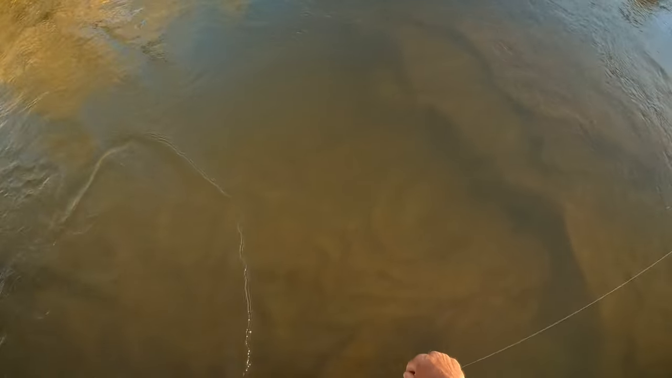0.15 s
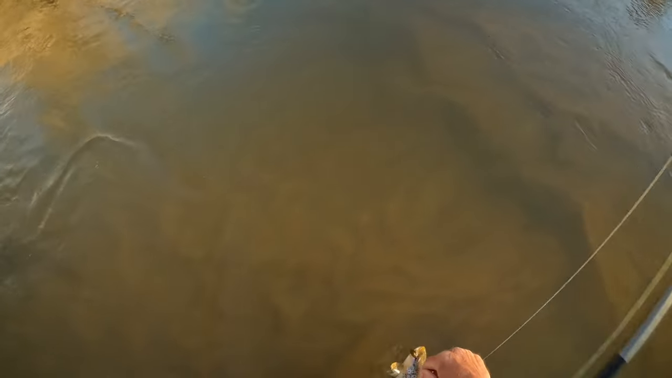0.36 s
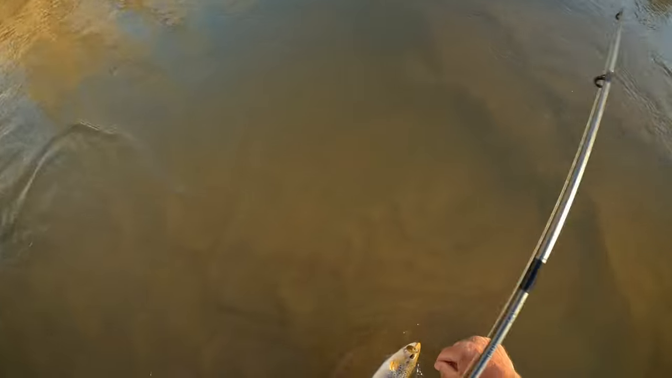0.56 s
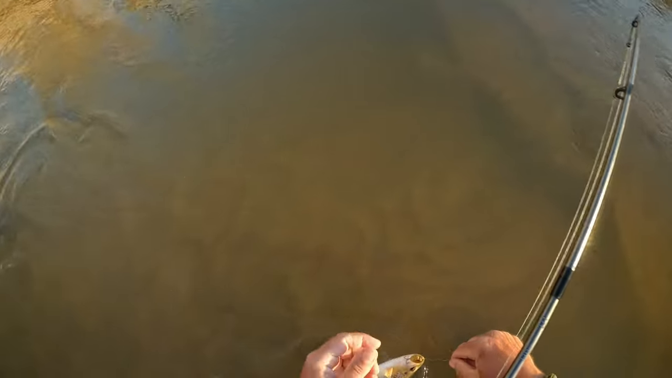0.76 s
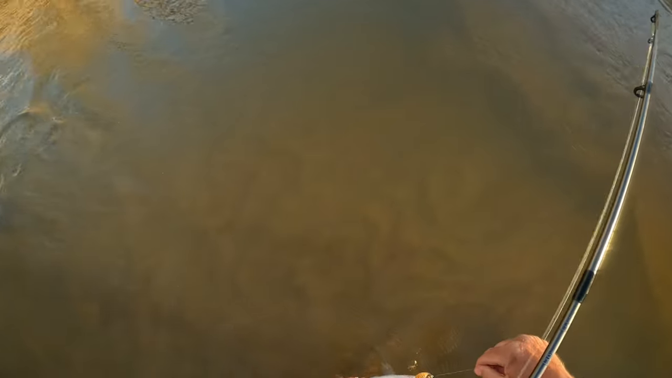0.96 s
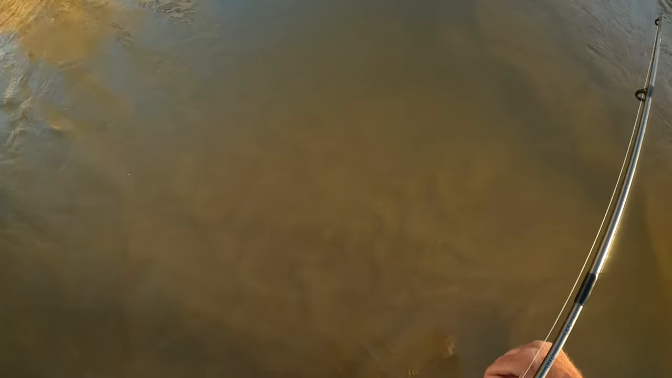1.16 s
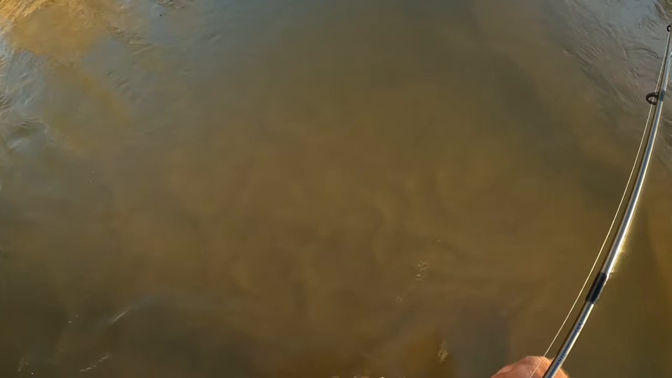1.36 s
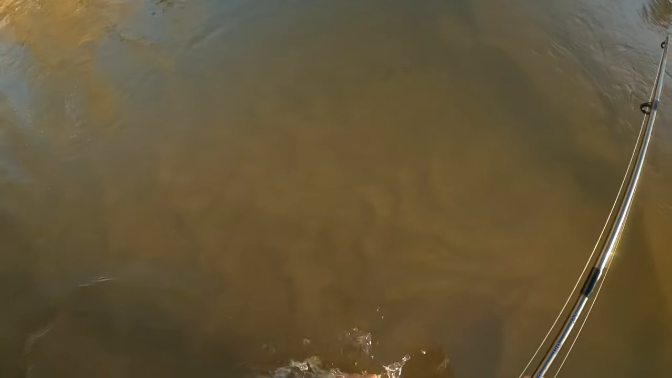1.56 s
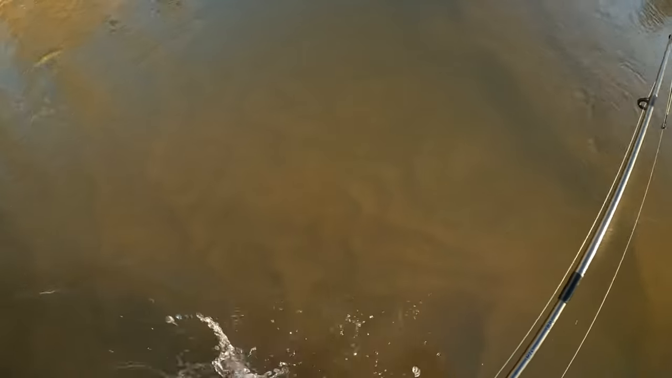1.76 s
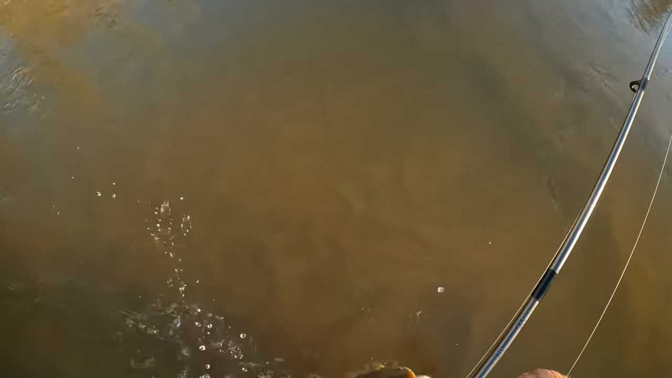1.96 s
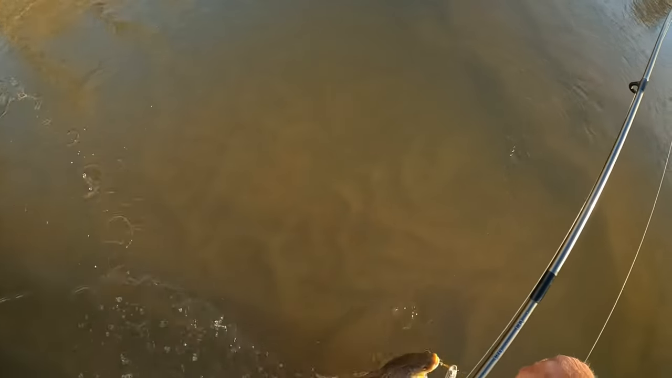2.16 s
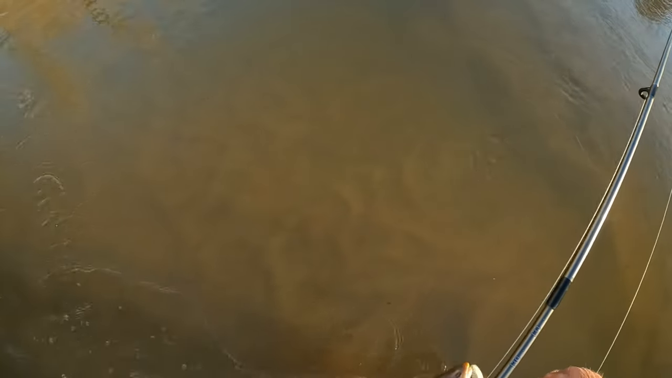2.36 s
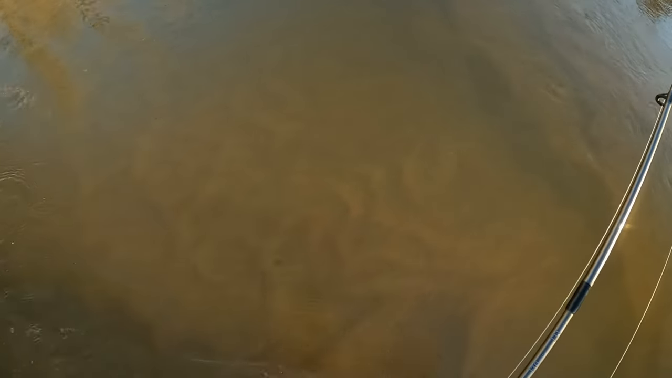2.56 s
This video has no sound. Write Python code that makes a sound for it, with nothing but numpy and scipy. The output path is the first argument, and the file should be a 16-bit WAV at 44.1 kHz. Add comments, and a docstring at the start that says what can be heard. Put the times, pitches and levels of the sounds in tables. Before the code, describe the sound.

Fish splashing: a few soft wet flaps, then a sudden burst of slapping, gulping water and drips

```python
"""A hooked fish is lifted dripping from a stream and flaps: noise-burst slaps and ticks, rising-sine bubbles.
All along, wind (low noise) rumbles on the microphones, mostly the right; the stream hisses and insects buzz
far off (noise bands). At 1.2 s a cricket trills, a pulsed swooping tone. From 1.5 s the fish is back in the
water and thrashes: slaps, spray and bubbles of dense grains, and gulping air pockets, which are gliding tones.
From 1.7 s the metal tackle chinks, clicks ringing a few high modes."""
import sys
import numpy as np
from scipy import signal
from scipy.fft import rfft, irfft, next_fast_len
from scipy.io import wavfile
from scipy.ndimage import uniform_filter1d, map_coordinates

SR = 44100
rng = np.random.default_rng(int(sys.argv[2]) if len(sys.argv) > 2 else 0)


def linear_from_db(decibels):
    """Turn decibels (scalar or array-like) into linear amplitude factors; 0 gives 1."""
    return 10 ** (np.asarray(decibels, float) / 20)


def store_wav(level_fs):
    """Save 16-bit WAV to argv[1]."""
    pcm = np.round(np.clip(np.atleast_2d(level_fs), -1, 1) * 32767)
    wavfile.write(sys.argv[1], SR, pcm.T.astype(np.int16))


N = 114660
T = np.arange(N) / SR

# Colour of water spray, also the treble of the slaps: frequency_hz, level_db
SPRAY_COLOUR = [(1200, -11.5), (2200, -3.5), (5500, -7), (6800, -2.5), (7800, -17), (10500, -11.5),
                (13300, -13.5), (14600, -57)]


def unit(x):
    """Scales a sound to rms 1."""
    return x / np.sqrt(np.mean(x ** 2) + 1e-20)


def along(points, hz):
    """Reads a curve of (Hz, value) points on a log frequency axis."""
    point_hz, value = np.transpose(points)
    return np.interp(np.log(hz + 1), np.log(point_hz + 1), value)


def curves(rows):
    """One value per sample for each column after the time."""
    s, *columns = np.transpose(rows)
    return [np.interp(T, s, column) for column in columns]


def wobble(rate):
    """A smooth random curve with rate knots a second."""
    knots = rng.standard_normal(int(N * rate / SR) + 4)
    return map_coordinates(knots, [T * rate])


def filtered(x, response):
    """Multiplies the spectrum of x by a response of frequency in Hz."""
    size = next_fast_len(x.shape[-1] + 8192)
    spectrum = rfft(x, size) * response(np.fft.rfftfreq(size, 1 / SR))
    return irfft(spectrum, size)[..., :x.shape[-1]]


def coloured(x, colour):
    """Gives a sound the colour of a (Hz, dB) table, at rms 1."""
    return unit(filtered(x, lambda hz: linear_from_db(along(colour, hz))))


def rush(colour, alike, patchy_db):
    """Stereo noise of rms 1 with patches of random gain; alike is the left-right correlation over Hz."""
    z = signal.stft(rng.standard_normal((2, N)), nperseg=256)[2]
    patches = uniform_filter1d(rng.standard_normal(z.shape[1:]), size=6, axis=0)
    patches = uniform_filter1d(patches, size=4, axis=1)
    pair = signal.istft(z * linear_from_db(patchy_db * unit(patches)), nperseg=256)[1][:, :N]

    def mid_and_side(hz):
        turn = np.arccos(np.clip(along(alike, hz), -1, 1)) / 2
        return linear_from_db(along(colour, hz)) * [np.cos(turn), np.sin(turn)]

    mid, side = filtered(pair, mid_and_side)
    return unit(np.array([mid + side, mid - side]))


def grains(count, hz, spread, cycles, scatter_db, pan_db):
    """Small bubbles at random times: damped rising sines, scattered in level and left to right, at rms 1."""
    length = 500  # samples
    chance, place = rng.random((count, 2)), rng.standard_normal((count, 2))
    pitch_hz = np.clip(hz * np.exp(spread * place[:, :1]), 300, 13000)
    turns = pitch_hz * np.arange(length) / SR
    wave = np.sin(2 * np.pi * turns * (1 + .12 * turns / cycles)) * np.exp(-3 * turns / cycles)
    wave = wave * linear_from_db(-scatter_db * np.log(chance[:, 1:] + .006))  # a few grains stand out
    at = ((chance[:, :1] * N).astype(int) + np.arange(length)).ravel()
    sides = [wave * linear_from_db(side * pan_db * place[:, 1:]) for side in (1, -1)]
    return unit(np.array([np.bincount(at, side.ravel(), N + length)[:N] for side in sides]))


def burst(db, hz, octaves, t60_s, skirt):
    """A 0.2 s noise burst with a fast attack, a band around hz and a flat skirt of gain above it."""
    t = np.arange(SR // 5) / SR

    def colour(f):
        band = np.exp(-(np.log2((f + 1) / hz) / octaves) ** 2 / 2)
        treble = linear_from_db(along(SPRAY_COLOUR, np.maximum(f, 5000)))
        return (band + skirt * (f > hz)) * treble

    attack = 1 - np.exp(-t / (0.014 * t60_s))
    noise = unit(filtered(rng.standard_normal(len(t)), colour))
    return linear_from_db(db - 6.5 - 60 * t / t60_s) * attack * noise


def slaps():
    """The body of the fish strikes the surface or the air: short bursts of coloured noise."""
    # Slaps: start_s, level_db (before burst's 6.5 dB cut), centre_hz, width_octaves, t60_s
    slap_rows = [(0.282, -33, 1700, 1.43, 0.047), (0.47, -40, 880, 3, 0.021),
                 (.579, -18, 1330, 0.87, 0.025), (0.602, -38.5, 1370, 1.26, 0.087),
                 (0.623, -22, 1100, 1.12, 0.044), (0.644, -27.5, 1160, 0.81, 0.1),
                 (0.717, -27.5, 607, 0.95, 0.023), (1.078, -21.5, 550, 1.86, 0.073),
                 (.919, -29, 620, 0.4, 0.021), (1.412, -29, 910, 1.21, 0.095),
                 (1.682, -6, 4900, 0.31, 0.0082), (1.764, -9.5, 3580, 4.1, 0.012),
                 (1.888, -6.5, 1880, 1.13, 0.036), (2.46, -27.5, 1400, 0.63, 0.092)]
    out = np.zeros(N + SR)
    for s, db, hz, octaves, t60_s in slap_rows:
        sound = burst(db, hz, octaves, t60_s, skirt=0)
        out[round(s * SR):][:len(sound)] += sound
    return out[:N]


def drop_ticks():
    """Crisp drop impacts: very short narrow bursts with a faint skirt above the centre."""
    # Impacts: start_s, level_db (before burst's 6.5 dB cut), centre_hz
    tick_rows = [(0.11, -28, 1420), (.184, -32.5, 7900), (.217, -30, 1710), (.302, -29.5, 2080),
                 (1.216, -24, 3540), (1.285, -38, 8800), (1.488, -26.5, 3180), (1.512, -15.5, 4370),
                 (1.686, -4.5, 4000), (1.572, -17, 6600), (1.584, -20, 6050), (1.606, -25, 3570),
                 (1.955, -14.5, 2520), (1.976, -23.5, 5630), (2.056, -17.5, 2150), (2.146, -30, 2950),
                 (2.182, -30, 3510), (2.262, -27, 4570), (2.324, -19, 4200), (2.356, -29, 4930),
                 (2.369, -20.5, 3600), (2.407, -39, 3600), (2.423, -29, 4400), (2.461, -30, 5250),
                 (2.564, -27, 9200)]
    out = np.zeros(N + SR)
    for s, db, hz in tick_rows:
        sound = burst(db, hz, octaves=0.39, t60_s=0.011, skirt=linear_from_db(-20.5))
        out[round(s * SR):][:len(sound)] += sound
    return out[:N]


def bubbles():
    """Single bubbles ring as damped sines of gliding, mostly rising pitch, with a shivering level."""
    # Bubbles: start_s, level_db (before shiver and gain), start_hz, rise_octaves_per_s, t60_s
    bubble_rows = [(.037, -38.5, 880, 11, 0.079), (0.112, -34, 1023, -10, 0.022),
                   (0.185, -44, 1305, 9, 0.04), (1.034, -53, 1030, 5.5, 0.15),
                   (1.546, -43.5, 1147, 5.5, 0.16), (1.572, -9.5, 324, 41, 0.0062),
                   (1.585, -25.5, 1784, -4, 0.013), (1.594, -36, 510, 28.5, 0.085),
                   (1.617, -35.5, 539, 39, 0.063), (1.633, -47, 1030, 5.5, 0.11),
                   (1.7656, -3, 315, -7, 0.019), (1.772, -18, 262, -7, 0.078),
                   (1.802, -19.5, 437, 55.5, 0.075), (1.849, -17, 626, 0, 0.013),
                   (1.872, -23.5, 941, -3, 0.043), (1.888, -20, 930, 8.5, 0.022),
                   (2.013, -37, 1278, 10, 0.059), (2.056, -34.5, 1810, 3, 0.02),
                   (2.209, -38, 2520, -43, 0.039), (2.314, -37.5, 1800, 18.5, 0.064),
                   (2.329, -34.5, 1355, -4, 0.043), (2.398, -42, 2400, 2, 0.021),
                   (2.53, -35.5, 1160, 15, 0.016), (2.542, -38, 2090, 21, 0.053)]
    out, t = np.zeros(N + SR), np.arange(SR // 5) / SR
    shiver_db = np.pad(2.5 * wobble(250), (0, SR))
    for s, db, hz, rise, t60_s in bubble_rows:
        start = round(s * SR)
        pitch_hz = hz * 2 ** (rise * np.minimum(t, t60_s))
        level = linear_from_db(db - 60 * t / t60_s + shiver_db[start:][:len(t)])
        attack = 1 - np.exp(-t * hz / 0.93)
        out[start:][:len(t)] += level * attack * 2.74 * np.sin(2 * np.pi * np.cumsum(pitch_hz) / SR)
    return out[:N]


def air_pockets():
    """Open air pockets ring while they close: unsteady gliding tones."""
    # One table a pocket: time_s, pitch_hz, level_db (before the 2 dB lift); pitch and level waver around these
    pocket_tables = [
        [(1.79, 264.9, -18.5), (1.81, 308.7, -51), (1.88, 336.5, -33.5), (1.98, 352, -58)],
        [(2.296, 305, -61), (2.303, 313, -38.5), (2.33, 292, -41.5), (2.358, 316, -43.5), (2.372, 303, -38),
         (2.40, 358, -43.5), (2.42, 423, -41), (2.44, 558, -45.5), (2.46, 627, -50)],
        [(2.548, 426.6, -93), (2.56, 414, -35.5), (2.6, 443, -35)],
    ]
    out = np.zeros(N)
    for rows in pocket_tables:
        hz, db = curves(rows)
        on = (T > rows[0][0]) & (T < rows[-1][0])
        pitch_hz = hz * (1 + 0.022 * wobble(90))
        out += on * linear_from_db(db + 2 + 2.5 * wobble(80)) * np.sin(2 * np.pi * np.cumsum(pitch_hz) / SR)
    return out


def churn():
    """Stirred water: low sloshing, bubbles in noise, fizz of spray and single falling drops."""
    # Stirring: time_s, sloshing_db, bubbling_db, spray_db
    thrash_rows = [(0, -61, -61.5, -70), (.27, -57.5, -62, -60.5), (.48, -55.5, -50.5, -56),
                   (.64, -45.5, -53, -51.5), (.72, -56.5, -63, -88), (.9, -56, -57, -67),
                   (1.06, -56.5, -67, -59.5), (1.11, -52, -51, -55.5), (1.42, -57.5, -56, -64),
                   (1.555, -68, -51, -46.5), (1.575, -45.5, -40.5, -39.5), (1.67, -51, -31.5, -29),
                   (1.70, -76, -52.5, -36), (1.745, -55, -49.5, -33.5), (1.77, -32.5, -28.5, -23.5),
                   (1.83, -31, -36, -34), (1.89, -29.5, -33.5, -30.5), (1.93, -47.5, -33.5, -32),
                   (2.0, -47, -42.5, -41), (2.1, -50, -45.5, -49.5), (2.2, -71.5, -53.5, -48.5),
                   (2.5, -60.5, -52, -49.5), (2.6, -44.5, -41.5, -36)]
    # Colour of the sloshing: frequency_hz, level_db
    slosh_colour = [(110, -26), (200, -5.5), (750, -4.5), (1300, -52)]
    # Colour of the bubbling: frequency_hz, level_db
    bubbling_colour = [(500, -42), (850, 4), (1300, 6), (2600, -8.5), (4500, -57)]
    slosh_db, bubbling_db, spray_db = curves(thrash_rows)
    wet = T > 1.5  # the fish is back in the water, bubbles take over
    share = np.where(wet, .85, .25)  # power share of the grains against plain noise
    alike = [(3000, 0.9), (12000, 0.59)]  # (Hz, left-right likeness)

    def mix(colour, grain):
        noise = rush(colour, alike, patchy_db=3.5)
        return np.sqrt(1 - share) * noise + np.sqrt(share) * coloured(grain, colour)

    slosh = mix(slosh_colour, grains(count=500, hz=550, spread=.4, cycles=6, scatter_db=2.5, pan_db=.2))
    bubbling = mix(bubbling_colour,
                   grains(count=1100, hz=1400, spread=.45, cycles=22, scatter_db=2.2, pan_db=.8))
    spray = mix(SPRAY_COLOUR,
                grains(count=3000, hz=4200, spread=0.563, cycles=15.2, scatter_db=3.5, pan_db=3.0))
    spray = linear_from_db(2.5 * wobble(70)) * filtered(spray, lambda hz: np.where(hz > 7500, .6, 1))
    drops = grains(count=450, hz=9000, spread=.5, cycles=1.5, scatter_db=2.5, pan_db=2.5)
    drops = wet * coloured(drops, SPRAY_COLOUR)
    return linear_from_db(slosh_db) * slosh + linear_from_db(bubbling_db) * bubbling + linear_from_db(spray_db) * (spray + .4 * drops)


def banks(x):
    """A short diffuse answer from the water and banks: decaying noise with its bass thinned."""
    t = np.arange(SR // 5) / SR
    tail = rng.standard_normal((2, len(t))) * linear_from_db(-60 * t / 0.043)  # t60 43 ms
    tail = filtered(tail, lambda hz: hz / (hz + 1500))
    return signal.fftconvolve(x[None], tail / np.linalg.norm(tail[0]), axes=1)[:, :N]


def tackle():
    """Metal parts knock together: a click rings a few high modes, a little unsteadily, right of centre."""
    # Knocks: start_s, level_db (before mode levels and pan)
    chink_rows = [(1.7368, -28), (1.7784, -37.5), (1.8272, -34.5), (2.277, -50)]
    # Modes of the metal: mode_hz, level_db (against the knock), t60_s
    metal_modes = [(6780, 1.5, 0.053), (8630, 2.5, 0.041), (12900, -7, 0.072)]
    out, t = np.zeros(N + SR), np.arange(SR // 10) / SR
    for s, db in chink_rows:
        sound = linear_from_db(7 - 60 * t / 0.011) * rng.standard_normal(len(t))  # the click
        for hz, level_db, t60_s in metal_modes:
            drift = np.cumsum(rng.normal(0, .04, len(t)))  # radians
            sound += linear_from_db(level_db - 60 * t / t60_s) * np.sin(2 * np.pi * hz * t + drift)
        out[round(s * SR):][:len(t)] += linear_from_db(db) * sound
    return filtered(out[:N], lambda hz: hz < 14200) * linear_from_db([[-2], [2]])


def cricket():
    """One cricket's uneven trill: tone pulses whose pitch swoops ever wider."""
    start_s, end_s, pulses_per_s = 1.208, 1.50, 54
    base_hz, widest_swoop_hz = 3680, 900
    beat = ((T - start_s) * pulses_per_s + .1 * wobble(8.1)) % 1
    on = (T > start_s) & (T < end_s)
    progress = (T - start_s) / (end_s - start_s)
    pitch_hz = base_hz + widest_swoop_hz * progress * (1 - 1.5 * beat) ** 2
    trill = on * np.sin(np.pi * beat) ** 2 * np.sin(2 * np.pi * np.cumsum(pitch_hz) / SR)
    return linear_from_db(-53.5 + 1.3 * wobble(22.8)) * trill


def wind():
    """Slow pressure swings and lumpy buffeting on the microphones, 6 dB stronger on the right."""
    # Gusts: time_s, rumble_db, buffeting_db (before pan; the buffeting wavers around its level)
    gust_rows = [(0, -38.5, -53), (.28, -24, -49.5), (.4, -27, -30), (.52, -27, -44), (.63, -25, -41),
                 (.7, -20, -53), (.79, -31.5, -42), (.91, -23.5, -38.5), (1.01, -37, -52.5),
                 (1.1, -36, -48), (1.3, -33, -47), (1.7, -27, -49.5), (2.15, -33.5, -55), (2.6, -37.5, -53)]
    # Colour of the deep rumble: frequency_hz, level_db
    rumble_colour = [(3, -80), (8, 5.5), (16, 14), (24, -7.5), (34, -5.5), (48, -88)]
    # Colour of the buffeting: frequency_hz, level_db
    buffet_colour = [(18, -81), (30, 2.5), (92, -13.5), (300, -31.5), (390, -92)]
    alike = [(30, .86)]  # (Hz, left-right likeness)
    rumble_db, buffet_db = curves(gust_rows)
    rumble = linear_from_db(rumble_db) * rush(rumble_colour, alike, patchy_db=0)
    buffeting = linear_from_db(buffet_db + 2.0 * wobble(25.55)) * rush(buffet_colour, alike, patchy_db=0)
    return (rumble + buffeting) * linear_from_db([[-3], [3]])


def stream():
    """The steady hiss of the stream: patchy coloured noise with a slowly wavering level."""
    # Colour of the stream: frequency_hz, level_db
    stream_colour = [(59, -56), (110, 1), (330, -11), (750, -22.5), (1100, -8), (2200, -17.5),
                     (6660, -19.5), (8000, -33.5), (11400, -31.5), (14400, -54)]
    # Stereo width of the stream: frequency_hz, left_right_likeness
    stream_alike = [(150, 0.86), (1000, 0.72), (12000, 0.9)]
    return linear_from_db(-55.5 + 1.5 * wobble(5.83)) * rush(stream_colour, stream_alike, patchy_db=4.0)


def insects():
    """Insects far off blur into one wide, patchy noise band."""
    hz, width_hz = 2916, 400
    band = [(hz - 2 * width_hz, -40), (hz - width_hz / 2, -3), (hz, 0),
            (hz + width_hz / 2, -3), (hz + 2 * width_hz, -40)]  # (Hz, dB)
    return linear_from_db(-57) * rush(band, [(3000, 0.3)], patchy_db=-4)


def scene():
    """The fish near the centre with its answer from the banks, then tackle, churn and background."""
    fish = slaps() + drop_ticks() + bubbles() + air_pockets()
    near = fish * linear_from_db([[-.3], [.3]]) + linear_from_db(-6) * banks(fish) + tackle() + churn()
    return near + cricket() + wind() + stream() + insects()


def roll_off(x):
    """The treble ends steeply here."""
    return signal.sosfilt(signal.butter(12, 14530, fs=SR, output="sos"), x)


def record(dry):
    """The finished mix as it is stored."""
    return roll_off(dry)


dry = scene()
out = record(dry)
store_wav(out)
```